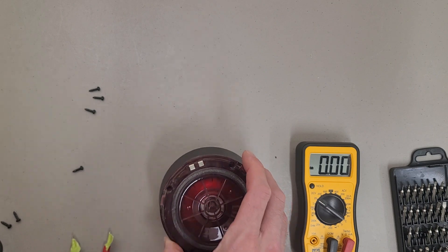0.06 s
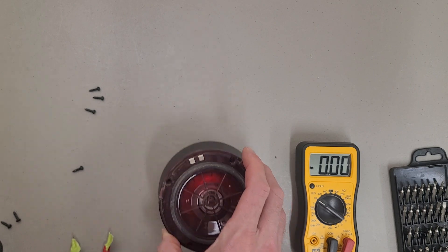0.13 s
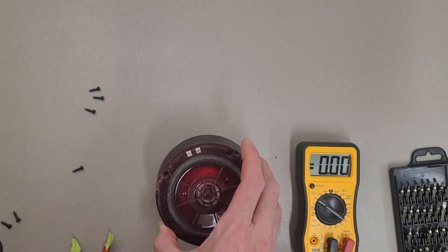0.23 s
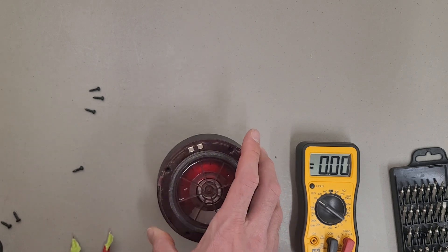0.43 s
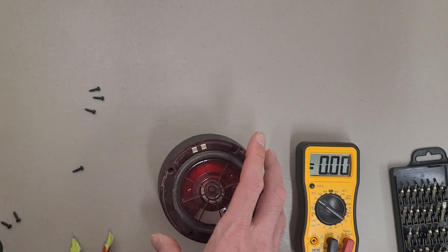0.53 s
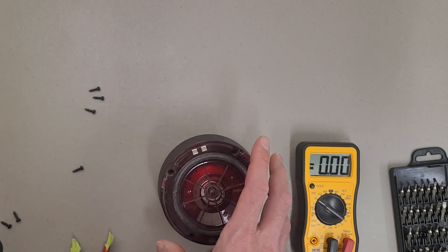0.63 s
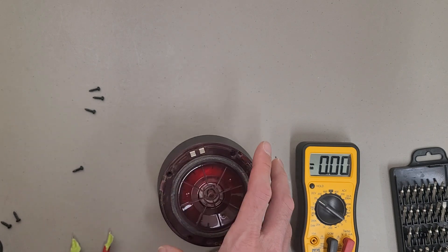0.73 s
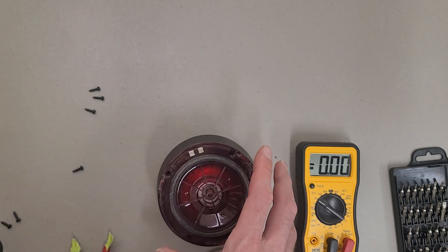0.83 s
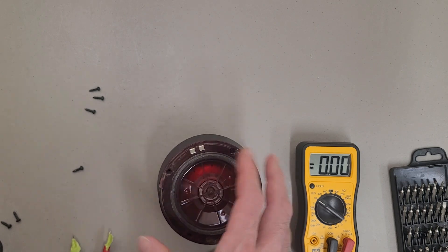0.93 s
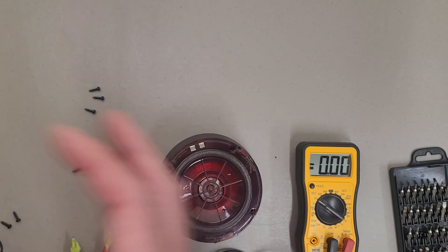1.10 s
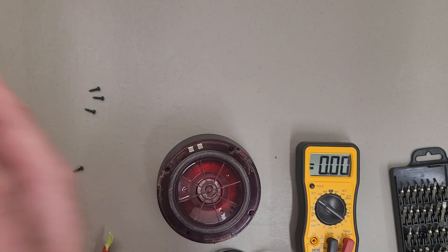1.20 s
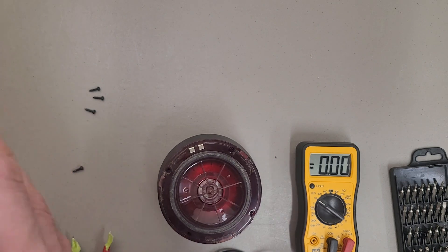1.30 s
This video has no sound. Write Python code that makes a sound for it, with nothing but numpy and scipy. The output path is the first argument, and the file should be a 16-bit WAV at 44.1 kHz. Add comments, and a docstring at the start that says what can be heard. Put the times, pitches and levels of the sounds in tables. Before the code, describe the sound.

A hollow plastic motor housing is set down on a table: a faint brush at 0.15 s, then a low thump with clustered knocks and plastic cracks at 0.16-0.19 s, lighter chatter and a short slide around 0.23 s, settling by 0.33 s. Very faint bumps and finger ticks follow near 0.37, 0.6, 0.8, 1.17 and 1.29 s. Short small-room reverberation, quiet air rumble, faint fan hum, spaced stereo microphones.

```python
"""Plastic motor housing set down on a table

The rim brushes, lands with a thump, chatters and slides to rest: pushes drive damped table modes,
contacts add knocks, cracks and shell modes, and the slide is dense random slips.
Fingers tick faintly as filtered noise bursts. A small room answers with a decaying noise tail,
over filtered-noise air and a fan hum of sines. Two spaced microphones listen.
"""
import sys
import numpy as np
from scipy import signal
from scipy.fft import rfft, irfft
from scipy.io import wavfile

SR = 44100
rng = np.random.default_rng(int(sys.argv[2]) if len(sys.argv) > 2 else 0)


def transcribe(signal):
    """Save signal, clipped to [-1, 1], as a 16-bit WAV file at the path in sys.argv[1]."""
    frames = np.atleast_2d(signal).T
    limited = np.clip(frames, -1, 1)
    pcm = np.round(limited * 32767).astype(np.int16)
    wavfile.write(sys.argv[1], SR, pcm)


N = 59535  # 1.35 s


def amp(db):
    """Decibels to gain."""
    return 10 ** (np.asarray(db) / 20)


def unit(x):
    """Scale to rms 1."""
    return x / np.sqrt(np.mean(x ** 2) + 1e-20)


def along(points, hz):
    """Interpolate (frequency, value) points on a log frequency axis."""
    point_hz, values = np.transpose(points)
    return np.interp(np.log(hz + 1), np.log(point_hz + 1), values)


def since(start_s):
    """Seconds since start_s, zero before it."""
    return np.maximum(np.arange(N) / SR - start_s, 0)


def filtered(x, response):
    """Multiply the zero-padded spectrum of x by response(hz)."""
    hz = np.fft.rfftfreq(2 * N, 1 / SR)
    return irfft(rfft(x, 2 * N) * response(hz))[..., :N]


def coloured(x, points):
    """Causal minimum-phase filter with the gain of (frequency, dB) points."""
    def response(hz):
        cepstrum = irfft(np.log(amp(along(points, hz))))
        folded = np.r_[cepstrum[0], 2 * cepstrum[1:N]]
        return np.exp(rfft(folded, 2 * N))
    return filtered(x, response)


# left-right likeness of diffuse sound: (frequency [Hz], coherence [-1 to 1])
COHERENCE = [(60, 1), (120, 0.82), (220, 0.81), (400, -0.4), (750, -0.51), (1300, -0.45), (2500, -0.19),
             (5000, 0.072), (15000, 0.47)]


def diffuse(pair):
    """Mix two unrelated signals to the left-right coherence of a diffuse field."""
    def mid_side_gains(hz):
        angle = np.arccos(np.clip(along(COHERENCE, hz), -1, 1)) / 2
        return np.array([np.cos(angle), np.sin(angle)])
    mid, side = filtered(pair, mid_side_gains)
    return np.array([mid + side, mid - side])


RIGHT_LAG_S = 0.00054


def spaced(x):
    """Direct sound reaches the right microphone later than the left."""
    lags_s = np.array([[0], [RIGHT_LAG_S]])
    return filtered(x, lambda hz: np.exp(-2j * np.pi * hz * lags_s))


def ring(modes, start_s, rise_s, scatter_db=0):
    """Struck damped modes, neighbours swinging in opposite directions."""
    t = since(start_s)
    waves = np.zeros(N)
    for k, (hz, db, t60_s) in enumerate(modes):
        level = (-1) ** k * amp(db + scatter_db * rng.standard_normal())
        waves += level * np.exp(-np.log(1000) * t / t60_s) * np.sin(2 * np.pi * hz * t)
    return waves * (1 - np.exp(-t / rise_s))


def burst(start_s, t60_s, colour, rise_s):
    """Stereo coloured noise with a fast rise and exponential decay."""
    t = since(start_s)
    noise = unit(coloured(rng.standard_normal((2, N)), colour))
    return noise * (1 - np.exp(-t / rise_s)) * np.exp(-np.log(1000) * t / t60_s)


# low modes of table top and air around it: (frequency [Hz], level [dB], t60 [s])
TABLE_MODES = [(40.32, -25.5, 0.67), (56.77, -35, 1.52), (59.7, -4.5, 0.089), (74.72, -10.5, 0.31),
               (100, -7.5, 0.077), (140.2, -11.5, 0.29), (175.8, -8, 0.17), (249.8, -2.5, 0.15),
               (296, -3, 0.1), (348.7, -9, 0.29)]
# pushes as the housing lands, rocks and is released: (time [s], strength [dB], contact time [s])
TABLE_PUSHES = [(0.158, -16, 0.002), (0.1682, 3.5, 0.0066), (0.1908, 6.5, 0.015), (.2066, -6.5, 0.0054),
                (0.3126, -13.5, 0.01), (0.3785, -20.5, 0.0094), (0.5143, -19, 0.013), (0.707, -25, .016)]


def thump():
    """Each push sets the table modes swinging; a longer contact is duller."""
    def force(hz):
        return sum(amp(db) * np.exp(-(hz * contact_s) ** 2 - 2j * np.pi * hz * s)
                   for s, db, contact_s in TABLE_PUSHES)
    return spaced(filtered(ring(TABLE_MODES, 0, rise_s=0.00013), force))


# contacts of rim with table: (time [s], strength [dB], extra crack level [dB])
RIM_CONTACTS = [(0.1639, -4.5, 3.5), (0.1696, -1, 2.5), (.1772, 1, -17.5), (0.1862, -7.5, -2),
                (0.1916, -9.5, 1), (.2235, -13, 0), (.232, -10.5, -10.5), (0.372, -29, -10)]
# modes of the plastic shell: (frequency [Hz], level [dB], t60 [s])
SHELL_MODES = [(390, -9, 0.15), (489, -5, 0.07), (530.2, -9, 0.15), (644, -10.5, 0.13), (705, -16, 0.074),
               (830, -6.5, 0.073), (928, -6.5, 0.079), (966, -9, .17), (1249.5, -12, .16),
               (1374, -28.5, 0.11), (1980, -20, 0.2)]
# dull knock of a contact: (frequency [Hz], gain [dB])
KNOCK_COLOUR = [(60, -28.5), (200, 18.5), (350, 23.5), (600, 23.5), (1000, 15.5), (1600, -12), (4000, -7.5),
                (16000, -44.5)]
# plastic cracking against the table: (frequency [Hz], relative density [dB per Hz])
CRACK_COLOUR = [(100, -31.5), (500, 15.5), (1200, 2.5), (1700, -7), (2800, -9.5), (4300, -9), (6200, -15),
                (7500, -21.5), (11000, -28.5), (16000, -35.5)]
SHELL_DB, KNOCK_DB, CRACK_DB = -24.5, -3.5, -25
CRACK_T60_S = 0.081
SHELL_JITTER_S = 0.000528
CRACK_PAN_DB = 1.96  # left up, right down by this much


def chatter():
    """Each rim contact knocks, cracks and rings the shell modes."""
    blows, shell, cracks = np.zeros(N), np.zeros(N), np.zeros((2, N))
    for s, db, crack_db in RIM_CONTACTS:
        blows[round(s * SR)] += amp(db + KNOCK_DB)
        shell_s = s + SHELL_JITTER_S * rng.standard_normal()
        shell += amp(db + SHELL_DB) * ring(SHELL_MODES, shell_s, rise_s=0.0002, scatter_db=0.5)
        crack = burst(s, CRACK_T60_S, CRACK_COLOUR, rise_s=0.000088)
        cracks += amp(db + crack_db + CRACK_DB) * crack
    knocks = coloured(blows, KNOCK_COLOUR)
    return spaced(shell + knocks) + cracks * amp([[CRACK_PAN_DB], [-CRACK_PAN_DB]])


# level of the sliding rim, follows its pressure: (time [s], level [dB])
SLIDE_LEVEL = [(0.143, -76.5), (0.154, -59), (0.164, -42), (0.169, -34), (0.21, -45.5), (.229, -38.5),
               (.255, -48.5), (.28, -57.5), (0.331, -88.5)]
# rim rubbing on the table: (frequency [Hz], relative density [dB per Hz])
RUB_COLOUR = [(100, -17), (300, 0.5), (600, 1.5), (1300, 10), (1700, -1.5), (2800, 0), (4300, -7.5),
              (6200, -19), (7500, -20), (11000, -33.5), (16000, -33.5)]
SLIPS_PER_S, SLIP_SPREAD_DB = 7800, 1


def slide():
    """Dense random slips of the rim as it brushes the table and slides to rest."""
    hits = rng.random(N) < SLIPS_PER_S / SR
    strengths = amp(SLIP_SPREAD_DB * rng.standard_normal(N))
    slips = hits * strengths * rng.standard_normal((2, N))
    level_db = np.interp(np.arange(N) / SR, *np.transpose(SLIDE_LEVEL))
    return unit(coloured(diffuse(slips), RUB_COLOUR)) * amp(level_db)


# finger ticks on the housing: (time [s], level [dB])
FINGER_TICKS = [(0.373, -73), (.586, -66.5), (0.8195, -78), (1.165, -73), (1.288, -65.5)]
# colour of a tick: (frequency [Hz], relative density [dB per Hz])
TICK_COLOUR = [(150, -6), (700, 2.5), (1800, 5.5), (4000, -5.5), (7000, -24), (16000, -34.5)]
TICK_T60_S, TICK_RISE_S = 0.099, 0.0045


def fingers():
    """Soft noise bursts as the grip shifts and lets go."""
    return sum(amp(db) * burst(s, TICK_T60_S, TICK_COLOUR, TICK_RISE_S) for s, db in FINGER_TICKS)


# reverberation time: (frequency [Hz], t60 [s])
REVERB_T60 = [(60, .6), (150, 0.31), (320, 0.49), (600, 0.29), (1300, 0.32), (3000, 0.26), (7000, 0.32),
              (15000, .19)]
# reverberation level: (frequency [Hz], gain [dB])
REVERB_COLOUR = [(30, -31.5), (100, -9), (250, -7), (600, -6), (1500, -1.5), (4000, -10), (15000, -27)]


def room(direct):
    """Convolve with a diffuse noise tail, each frequency decaying at its own rate."""
    hz, t, spectrum = signal.stft(rng.standard_normal((2, N)), SR, nperseg=256)
    rate = np.log(1000) / along(REVERB_T60, hz)[:, None]
    decaying = spectrum * np.exp(-rate * t) * np.sqrt(2 * rate / SR)  # energy independent of t60
    tail = signal.istft(decaying, SR, nperseg=256)[1][:, :N]
    onset = 1 - np.exp(-since(0.0013) / 0.0044)
    tail = coloured(diffuse(tail), REVERB_COLOUR) * onset
    return signal.fftconvolve(direct[:1], tail, axes=1)[:, :N]  # left channel feeds both sides


# room air noise: (frequency [Hz], relative density [dB per Hz])
AIR_COLOUR = [(20, -22), (38, -11), (58, -1), (80, -3.5), (115, -12.5), (200, -25), (350, -19.5),
              (750, -22.5), (1000, -26.5), (1400, -31), (2100, -41.5), (3300, -43), (4800, -52),
              (5400, -46), (5850, -39), (6700, -68), (16000, -61.5)]
# left minus right level of the air noise: (frequency [Hz], difference [dB])
AIR_LEFT_RIGHT = [(100, 1), (400, -5.5), (1300, -5.5), (2400, -4.5), (4400, 1), (8000, 8.5), (15000, 6)]
# steady hum of a fan: (frequency [Hz], level [dB rms])
FAN_HUM = [(339, -76.5), (565, -78.5), (732, -80.5)]
AIR_DB = -57  # before left-right balance


def room_tone():
    """Diffuse filtered noise for rumble and hiss, steady sines for the fan hum."""
    air = unit(coloured(diffuse(rng.standard_normal((2, N))), AIR_COLOUR))
    halves = np.array([[0.5], [-0.5]])
    air = filtered(air, lambda hz: amp(along(AIR_LEFT_RIGHT, hz) * halves))
    hum = np.zeros(N)
    for hz, db in FAN_HUM:
        cycles = hz * since(0) + rng.random()
        hum += amp(db) * np.sqrt(2) * np.sin(2 * np.pi * cycles)
    return amp(AIR_DB) * air + hum


def scene():
    """Sum the housing, the fingers, their reverberation and the room tone."""
    direct = thump() + chatter() + slide() + fingers()
    return direct + room(direct) + room_tone()


LOW_CUT_HZ, TOP_HZ = 47.3, 16100


def record(dry):
    """The recorder cuts the deepest bass and keeps nothing above its band limit."""
    high_pass = signal.butter(2, LOW_CUT_HZ, "high", fs=SR, output="sos")
    lean = signal.sosfilt(high_pass, dry)
    return filtered(lean, lambda hz: hz < TOP_HZ)


dry = scene()
out = record(dry)
transcribe(out)
```